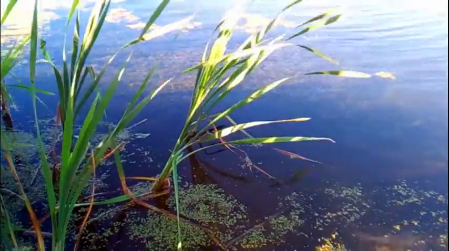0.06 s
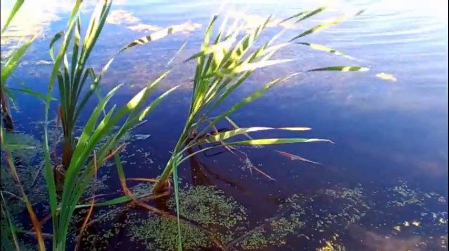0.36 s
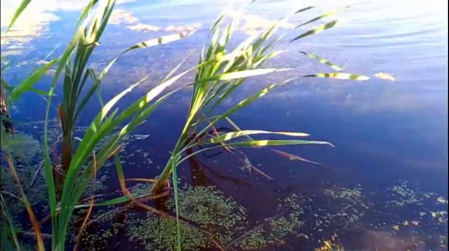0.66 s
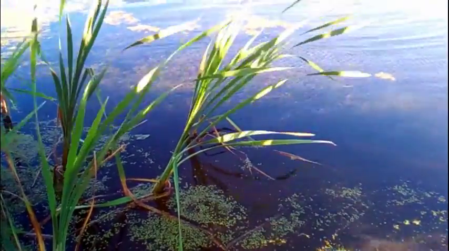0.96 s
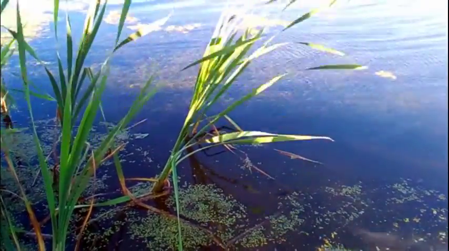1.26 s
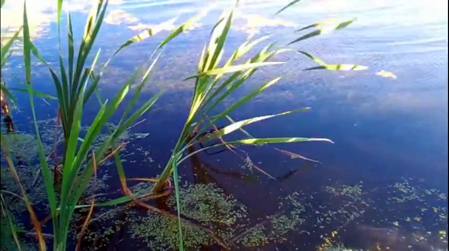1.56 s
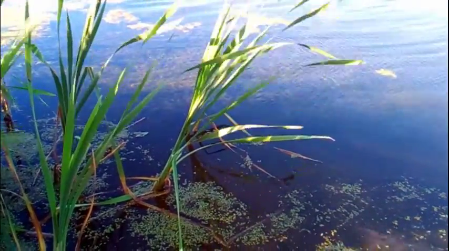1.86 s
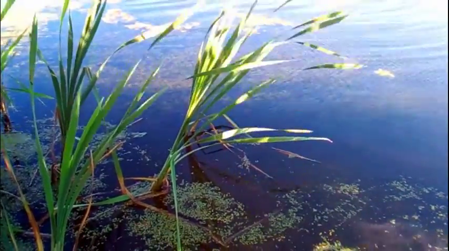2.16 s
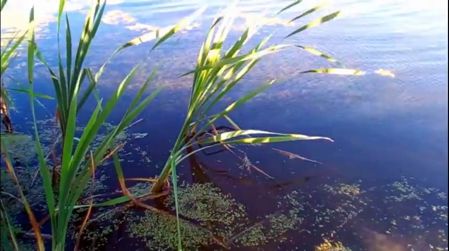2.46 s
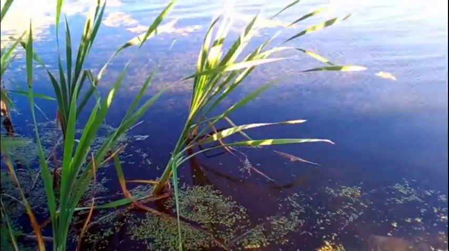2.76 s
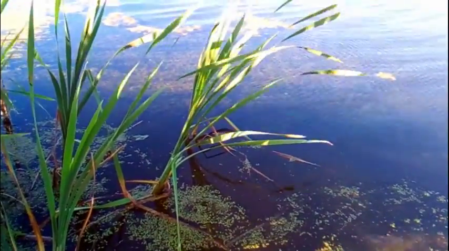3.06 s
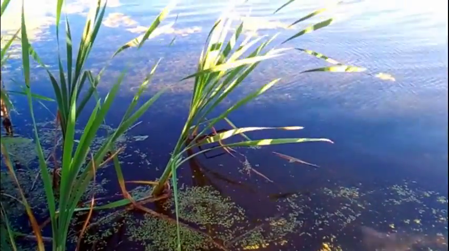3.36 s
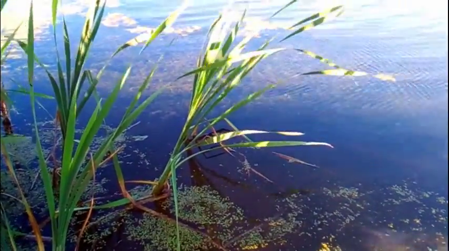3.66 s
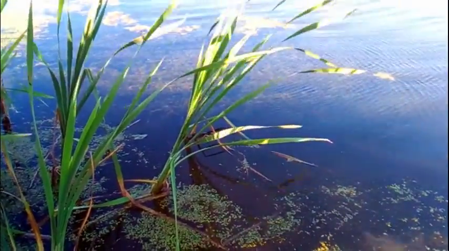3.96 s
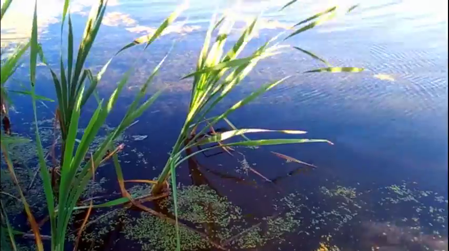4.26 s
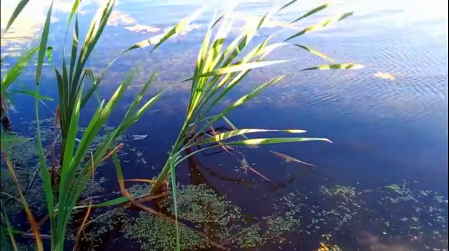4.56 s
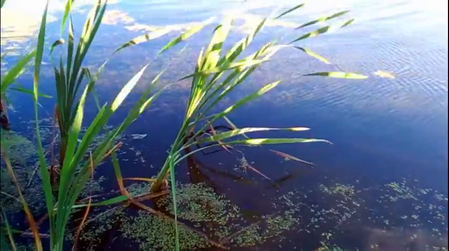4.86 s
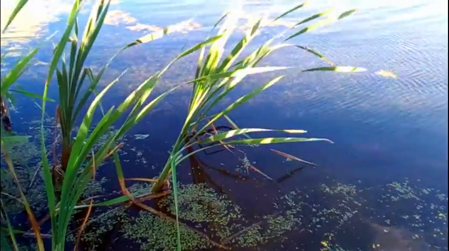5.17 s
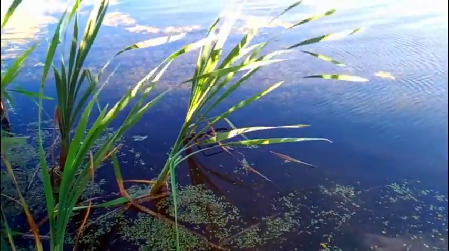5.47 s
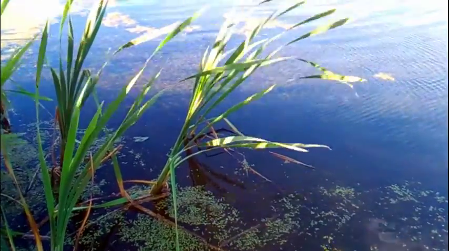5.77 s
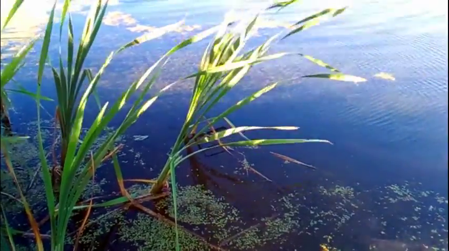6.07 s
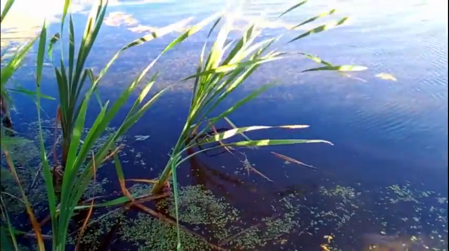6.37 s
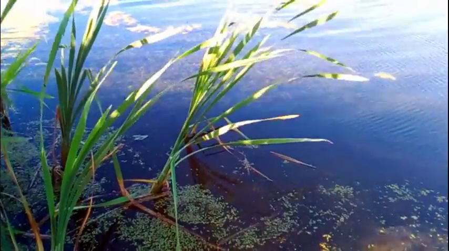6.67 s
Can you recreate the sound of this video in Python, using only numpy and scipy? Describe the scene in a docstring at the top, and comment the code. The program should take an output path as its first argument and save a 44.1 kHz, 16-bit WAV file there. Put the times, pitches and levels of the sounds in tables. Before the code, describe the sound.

Wind thumps on the microphone and rustles reeds by a pond while a small songbird twitters and chirps close by.

```python
"""At the edge of a pond, one microphone among the reeds. Leaves brush and tick in the breeze over a
distant rumble, and gusts buffet the microphone port, their strongest eddies landing as thumps.
Close by, a swallow-like songbird twitters: hoarse chatter, slurred whistles, dry rattles and chirps
sung with both sides of the syrinx. Other birds trill farther off. Plants along the bank scatter
a faint tail after the song, and the recorder adds a thin hiss."""
import sys
import numpy as np
from scipy import signal
from scipy.fft import rfft, irfft, next_fast_len
from scipy.io import wavfile
from scipy.ndimage import uniform_filter1d, minimum_filter1d, map_coordinates

SR = 44100
rng = np.random.default_rng(int(sys.argv[2]) if len(sys.argv) > 2 else 0)


def master(y):
    """Save y as 16-bit WAV."""
    cut = np.clip(np.atleast_2d(y).T, -1, 1)
    pcm = np.round(cut * 32767)  # scale
    wavfile.write(sys.argv[1], SR, pcm.astype(np.int16))


N = 295911

# The breeze in the nearby reeds. Each row: time in seconds, relative rustle level in dB.
BREEZE_LEVELS = [(0, -40), (1.1, -42), (1.9, -45.5), (3.1, -47), (3.95, -45), (4.5, -44.5), (5.25, -46),
                 (5.63, -43), (6.1, -44), (6.71, -42)]
# The rumble in the distance. Each row: time in seconds, relative level in dB.
RUMBLE_LEVELS = [(0, -42), (1.1, -45.5), (2.7, -44.5), (3.1, -42), (3.95, -41.5), (4.3, -44.5), (5.65, -42),
                 (6.1, -46)]
# Gusts that reach the microphone. Each row: start in seconds, hold in seconds, relative force in dB.
MIC_GUSTS = [(0, 0.11, -37.5), (0.323, 0.16, -39.5), (0.472, 0.061, -21), (0.608, 0.35, -26.5),
             (1.015, .03, -22), (1.109, 0.15, -23), (1.415, 0.11, -30.5), (1.545, 0.2, -25),
             (1.811, 0.12, -26.5), (2.092, 0.074, -36.5), (2.368, 0.07, -29), (2.5, 0.06, -35),
             (2.713, 0.088, -37.5), (5.431, 0.031, -31), (5.92, .08, -37.5), (6.154, 0.021, -20),
             (6.217, 0.048, -13.5), (6.385, 0.11, -18), (6.553, 0.32, -15.5)]
# The strongest eddies at the port. Each row: centre time in seconds, level in dB, pitch in Hz.
PORT_EDDIES = [(.046, -19.5, 141), (.473, -3.5, 91), (.499, -2.5, 99), (.553, -11.5, 79.5), (.633, -1, 160),
               (0.749, -11.5, 145), (.781, -7.5, 102), (0.836, -12.5, 129), (0.891, -0.5, 135),
               (1.182, -13.5, 153), (1.447, -22, 166), (1.637, -9, 139), (1.824, -11.5, 135),
               (1.851, -9.5, 122), (2.425, -11.5, 134), (2.544, -16, 129), (6.17, -8.5, 136),
               (6.222, -9.5, 178), (6.255, -6, 165), (6.296, -5, 100), (6.386, -3.5, 118),
               (6.489, -0.5, 119), (6.568, -1.5, 161), (6.602, 0.5, 92)]

# Chatter close by. Each row: start in seconds, number of notes, spacing in seconds, relative opening
# levels of the low and the high voice in dB, fade of the high voice in dB per note.
CHATTER_PHRASES = [(.005, 3, 0.023, -51, -34.5, 3), (.233, 2, 0.023, -49, -40, -5),
                   (.735, 4, 0.027, -51, -32.5, 1), (2.352, 5, 0.021, -38.5, -40, 1.5),
                   (2.536, 5, .022, -39, -37, 4.5), (2.716, 5, .022, -40, -37.5, 3.5)]
# Trills farther off. Each row: start and length in seconds, start and end pitch in Hz, level in dB.
FAR_TRILLS = [(.21, 0.1, 1550, 1640, -45.5), (0.43, 0.041, 3330, 3320, -38.5),
              (3.058, 0.1, 4860, 4900, -44), (4.29, 0.13, 3760, 3390, -45), (6.371, 0.16, 3580, 3085, -36)]
# Whistles close by. Each row: start and length in seconds, start, middle and end pitch in Hz,
# level in dB.
WHISTLE_NOTES = [(.51, 0.03, 1670, 1790, 1840, -39), (1.429, 0.021, 6300, 6440, 5860, -37),
                 (1.434, .033, 5700, 4740, 4570, -34.5), (1.842, 0.096, 3500, 3060, 2540, -42.5),
                 (1.85, 0.084, 4150, 3860, 3130, -38), (3.486, 0.069, 4250, 4510, 4500, -39)]
# Chirps close by. Each row: start and length in seconds, pitch near the slide's top in Hz, level in dB.
CHIRP_NOTES = [(0.921, 0.048, 3210, -37.5), (1.014, 0.055, 3190, -35.5), (1.113, 0.051, 3260, -35.5),
               (1.217, 0.055, 3260, -34.5), (1.316, 0.058, 3200, -35.5), (2.917, 0.06, 3120, -38),
               (3.022, .052, 3060, -37), (3.107, 0.054, 3080, -39), (3.204, 0.052, 3110, -40),
               (3.309, 0.055, 3120, -40)]
# The slide of one chirp. Each row: share of its length, multiple of its pitch, relative level in dB.
CHIRP_SLIDE = [(0, .79, -18), (.2, .8, -8), (.42, .87, -2), (.6, .94, 0), (.75, 1.02, 0), (.87, 1, -3),
               (1, .86, -12)]
# Dry rattles close by. Each row: start in seconds, number of pulses, relative level in dB.
RATTLE_BURSTS = [(1.535, 8, -25), (1.731, 3, -27.5), (2.022, 9, -24.5), (2.211, 3, -24.5)]

# The colour of each noise. Each row: frequency in Hz, relative spectral density in dB.
REED_SPECTRUM = [(300, -8.5), (700, -5.5), (1100, -6.5), (1700, -4), (2400, -2.5), (3200, -1.5), (4500, 1),
                 (6200, 1.5), (7000, -2), (8000, -11), (10000, -19.5), (12500, -26), (15500, -22)]  # leaves brushing together
TICK_SPECTRUM = [(500, -13), (2500, -5), (6300, 0.5), (8500, -13), (15000, -24)]  # one dry leaf flicking another
RUMBLE_SPECTRUM = [(25, -27), (50, 1.5), (80, -0.5), (140, -0.5), (230, 0), (320, -3), (430, -7),
                   (540, -12.5), (750, -15.5), (1200, -28), (2500, -79)]  # the distant rumble
BUFFET_SPECTRUM = [(20, -7.5), (36, -30), (65, -1.5), (110, -1), (160, -9.5), (230, -20.5), (350, -39.5),
                   (600, -77), (1500, -100)]  # turbulence on the port
CHURN_SPECTRUM = [(60, -21), (150, -0.5), (230, 5.5), (350, -1.5), (480, -14.5), (650, -21.5), (1000, -52),
                  (2000, -82), (4000, -110)]  # small, fast eddies of a strong gust
FLUTTER_SPECTRUM = [(100, -43), (250, 7.5), (500, 2), (850, -10.5), (1150, -35), (1550, -43), (1900, -58),
                    (6000, -101)]  # an eddy tearing at the port
EDGE_SPECTRUM = [(300, -34), (800, -6), (1100, 7), (1550, -4), (1850, -29), (4000, -26), (9000, -63)]  # the bright torn edge of the hardest eddies
BEAK_SPECTRUM = [(1500, -63), (2700, -18), (3500, -11), (4500, -6.5), (5400, -7.5), (6600, -4), (7400, -12),
                 (8300, -46), (10000, -66), (12000, -80)]  # rasp through throat and beak
HISS_SPECTRUM = [(12000, -56.5), (14000, -36), (14700, -2), (16000, -15)]  # the recorder's own hiss


def amp(db):
    """Decibels to gain."""
    return 10 ** (np.asarray(db) / 20)


def unit(x):
    """Scale to rms 1."""
    return x / np.sqrt(np.mean(x ** 2) + 1e-20)


def curve(rows):
    """Join (seconds, value) points into one value per sample."""
    return np.interp(np.arange(N) / SR, *np.transpose(rows))


def wobble(rate):
    """A smooth random curve, rate knots a second."""
    return map_coordinates(rng.standard_normal(int(N * rate / SR) + 4), [np.arange(N) * rate / SR])


def filtered(x, response):
    """Filter x by a gain that depends on frequency."""
    size = next_fast_len(N + SR // 4)
    return irfft(rfft(x, size) * response(np.fft.rfftfreq(size, 1 / SR)), size)[:N]


def coloured(x, spectrum):
    """x shaped by (Hz, dB) points on a log axis, at rms 1."""
    points_hz, db = np.transpose(spectrum)
    return unit(filtered(x, lambda hz: amp(np.interp(np.log(hz + 1), np.log(points_hz), db))))


def noise(spectrum):
    """Steady coloured noise of rms 1."""
    return coloured(rng.standard_normal(N), spectrum)


def patchy(depth_db):
    """White noise with drifting patches of gain in time and frequency."""
    bins = signal.stft(rng.standard_normal(N), nperseg=512)[2]
    patches = uniform_filter1d(rng.standard_normal(bins.shape), size=9, axis=0)
    patches = uniform_filter1d(patches, size=12, axis=1)
    return signal.istft(bins * amp(depth_db * unit(patches)), nperseg=512)[1][:N]


def add(track, start, x):
    """Mix x into the track at start seconds."""
    part = track[max(round(start * SR), 0):][:len(x)]
    part += x[:len(part)]


def span(length):
    """Progress 0-1 through a note of length seconds."""
    return np.linspace(0, 1, max(int(length * SR), 2))


def arch(u):
    """A swell that starts and ends in silence."""
    return np.abs(np.sin(np.pi * u))


def tone(hz, unsteady=0.0096):
    """A sine that follows a pitch curve, with the slight tremor of a living voice."""
    tremor = map_coordinates(rng.standard_normal(len(hz) // 100 + 4), [np.arange(len(hz)) / 100])
    return np.sin(2 * np.pi * (np.cumsum(hz * (1 + unsteady * tremor)) / SR + rng.random()))


def reeds(tick_rate=90, tick_db=-15, tick_growth=1.5, far_db=-51):
    """Leaves brush near the microphone and tick more as the breeze rises; far foliage is a dull wash."""
    level_db = curve(BREEZE_LEVELS) + 0.5
    stir = amp(tick_growth * (level_db - level_db.mean()))
    ticks = (rng.random(N) < stir * tick_rate / SR) * rng.standard_normal(N)
    brushing = patchy(depth_db=0.8) * amp(0.5 * wobble(12))
    near = coloured(brushing, REED_SPECTRUM) + amp(tick_db) * coloured(ticks, TICK_SPECTRUM)
    far = noise([(200, -28), (600, -6.5), (1000, 1.5), (2000, 0.5),
                 (3500, -3.5), (7000, -38), (10000, -40)])
    return amp(level_db) * near + amp(far_db) * far


def distant_rumble():
    """A low noise from far off that slowly swells and sinks."""
    return amp(curve(RUMBLE_LEVELS) + 0.5) * noise(RUMBLE_SPECTRUM)


def gusts(rise_s=0.02, fall_s=0.038, lull_db=-51.5, churn_db=6, churn_growth=1.618):
    """Turbulence rumbles on the microphone port as each gust rises quickly, holds and dies away."""
    t = np.arange(N) / SR
    power = amp(lull_db) ** 2  # the air still stirs between gusts
    for start, hold, db in MIC_GUSTS:
        falloff = np.maximum(start - t, 0) / rise_s + np.maximum(t - start - hold, 0) / fall_s
        power = power + (amp(db) * np.exp(-falloff)) ** 2
    force_db = 10 * np.log10(power) + 2 * wobble(45)
    roar = amp(force_db + 3) * noise(BUFFET_SPECTRUM)
    # faster air sheds smaller eddies, so a higher churn gains on the roar in strong gusts
    churn = amp(churn_growth * force_db + churn_db) * noise(CHURN_SPECTRUM)
    return roar + churn


def eddies(flutter_db=-25, tear_db_per_octave=35.5, typical_hz=130.4, edge_db=-3):
    """Each strong eddy hits the port as one pressure swing with a torn edge; faster ones tear more."""
    swings, tearing = np.zeros(N), np.zeros(N)
    t = np.arange(-SR // 40, SR // 40) / SR
    width_s = np.where(t < 0, 0.004, 0.008)  # the tear comes abruptly and trails off
    for centre, db, hz in PORT_EDDIES:
        cycles = t * hz
        phase = cycles + 0.12 * np.tanh(2 * cycles)  # the swing is quickest as the core passes
        swell = np.exp(-(cycles / 0.59) ** 2)
        add(swings, centre + t[0], amp(db) * swell * np.sin(2 * np.pi * phase))
        tear_db = db + flutter_db + tear_db_per_octave * np.log2(hz / typical_hz)
        add(tearing, centre - 0.001 + t[0], amp(tear_db) * np.exp(-(t / width_s) ** 2))
    edge = amp(edge_db) * tearing ** 2 * noise(EDGE_SPECTRUM)  # only the hardest tears sound bright
    return swings + tearing * noise(FLUTTER_SPECTRUM) + edge


def chatter(voice_db=-2, under_db=-6, rasp_db=-1, grow_db=0.64, sink=0.0252):
    """Quick falling notes in several hoarse voices; note by note the low voice grows and sinks."""
    voices, rasp = np.zeros(N), np.zeros(N)
    u = span(0.0231)
    for first, notes, gap, low_start_db, high_start_db, fade_db in CHATTER_PHRASES:
        for k in range(round(notes)):
            start = first + k * gap
            low_db, high_db = low_start_db + grow_db * k, high_start_db - fade_db * k
            jitter = np.interp(u, np.linspace(0, 1, 20), rng.standard_normal(20))
            fall = (1 + rng.normal(0, 0.015)) * (1.12 - 0.24 * u) * (1 + 0.017 * jitter)
            low = tone(4600 * (1 - sink * k) * fall) + amp(under_db) * tone(3350 * fall)
            high = tone(6550 * np.sqrt(fall)) + 0.7 * tone(5850 * fall)
            note = amp(low_db) * low + amp(high_db) * high
            add(voices, start, amp(voice_db) * arch(u) ** 0.97 * note)
            add(rasp, start, amp(rasp_db + (low_db + high_db) / 2) * arch(u))
    return voices + rasp * noise(BEAK_SPECTRUM)


def bank_scatter(song, t60, wet_db):
    """The plants along the bank scatter a short, faint tail back to the microphone."""
    t = np.arange(SR // 2) / SR
    tail = rng.standard_normal(len(t)) * amp(-60 * t / t60)
    return song + amp(wet_db) * signal.fftconvolve(song, tail / np.linalg.norm(tail))[:N]


def trills(warble_hz=85, swing=0.13, leap=0.086):
    """Birds farther off sing gliding notes with a fast warble; every second swing leaps higher."""
    out = np.zeros(N)
    for start, length, start_hz, end_hz, db in FAR_TRILLS:
        u = span(length)
        glide_hz = start_hz + (end_hz - start_hz) * u
        turn = 2 * np.pi * warble_hz * (u * length - 0.005)
        warble = 1 + swing * np.cos(turn) + leap * np.cos(turn / 2)
        add(out, start, amp(db) * arch(u) * tone(glide_hz * warble))
    return out


def whistles():
    """Pure notes from the near bird, each bending through three pitches."""
    out = np.zeros(N)
    for start, length, *bend_hz, db in WHISTLE_NOTES:
        u = span(length)
        hz = np.polyval(np.polyfit([0, 0.5, 1], bend_hz, 2), u)
        add(out, start, amp(db) * arch(u) * tone(hz))
    return out


def chirps(pip_db=-3, overtone_db=-11):
    """One side of the syrinx slides upward while the other opens with a short, higher pip."""
    out = np.zeros(N)
    shares, pitch, shape_db = np.transpose(CHIRP_SLIDE)
    pip_swell = arch(span(0.021))
    for start, length, hz, db in CHIRP_NOTES:
        u = span(length) ** rng.uniform(1.0, 1.026)  # no two slides are paced alike
        slide = tone(hz * np.interp(u, shares, pitch))
        add(out, start, amp(db + np.interp(u, shares, shape_db)) * slide)
        pip_hz = hz * (1.03 + 0.054 * pip_swell)
        pip = amp(db + pip_db) * tone(pip_hz) + amp(db + overtone_db) * tone(1.25 * pip_hz)
        add(out, start, pip_swell * pip)
    return out


def rattles(gap_s=0.0171, rasp_db=-10, taper_db=4.5):
    """Bursts of toneless pulses, softer at both ends, coloured by throat and beak."""
    envelope = np.zeros(N)
    pulse = arch(span(0.013))
    for start, pulses, db in RATTLE_BURSTS:
        for k in range(round(pulses)):
            off_centre = (2 * k + 1) / round(pulses) - 1
            pulse_db = db + rasp_db - taper_db * off_centre ** 2
            add(envelope, start - 0.001 + k * gap_s, amp(pulse_db) * pulse)
    return envelope * noise(BEAK_SPECTRUM)


def scene():
    """Reeds, distant rumble, wind and birds near and far, all on one microphone."""
    ambience = reeds() + distant_rumble() + gusts() + eddies()
    near_song = bank_scatter(chatter() + whistles() + chirps() + rattles(), t60=0.1, wet_db=-10)
    far_song = bank_scatter(trills(), t60=0.5, wet_db=-5.5)
    return (ambience + near_song + far_song)[None]


def record(dry, hiss_db=-67, top_hz=15550):
    """The recorder adds a thin high hiss, limits the hardest thumps and keeps nothing above top_hz."""
    x = dry[0] + amp(hiss_db) * noise(HISS_SPECTRUM)
    needed_gain = 1 / np.maximum(np.abs(x), 1)
    limiter_gain = uniform_filter1d(minimum_filter1d(needed_gain, size=221), size=221)  # 5 ms windows
    return filtered(x * limiter_gain, lambda hz: hz < top_hz)[None]


dry = scene()
out = record(dry)
master(out)
```